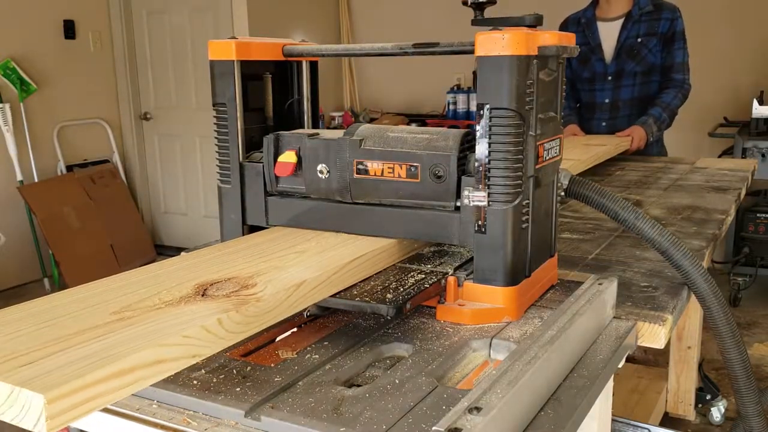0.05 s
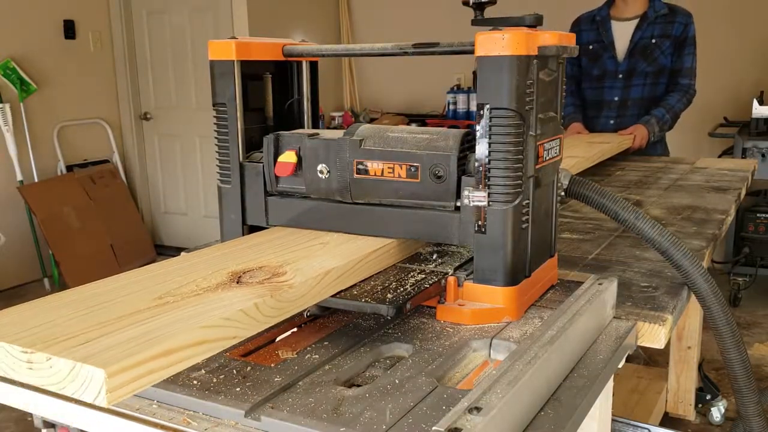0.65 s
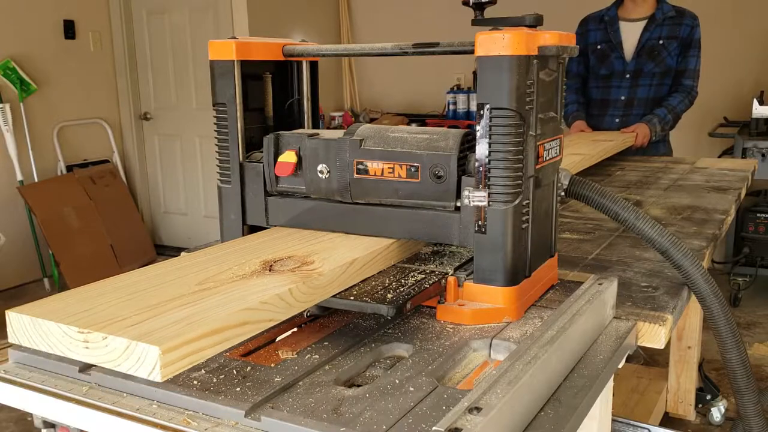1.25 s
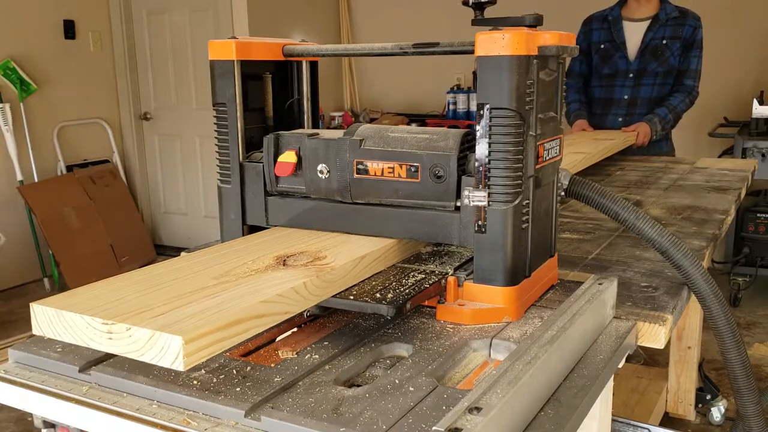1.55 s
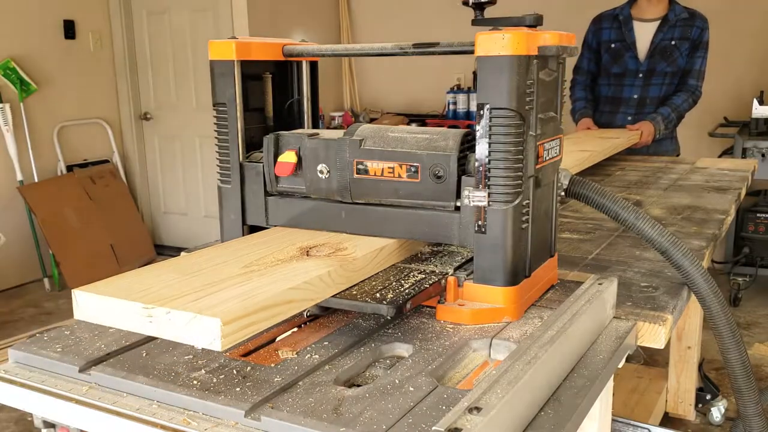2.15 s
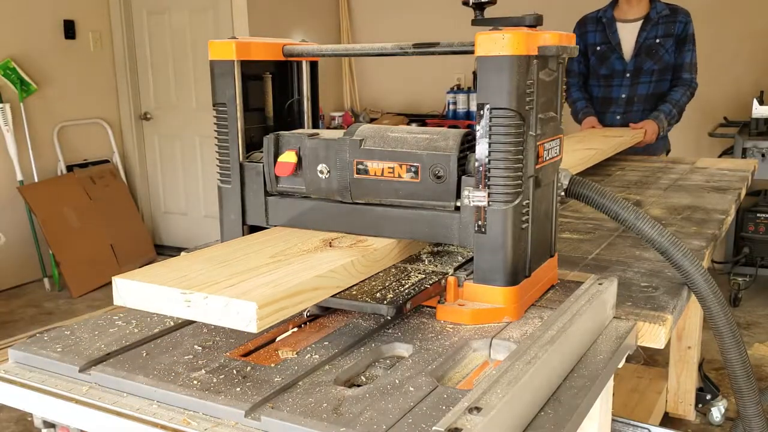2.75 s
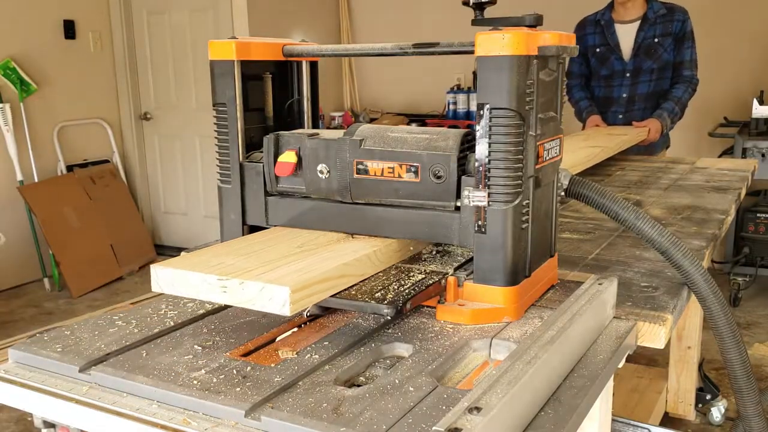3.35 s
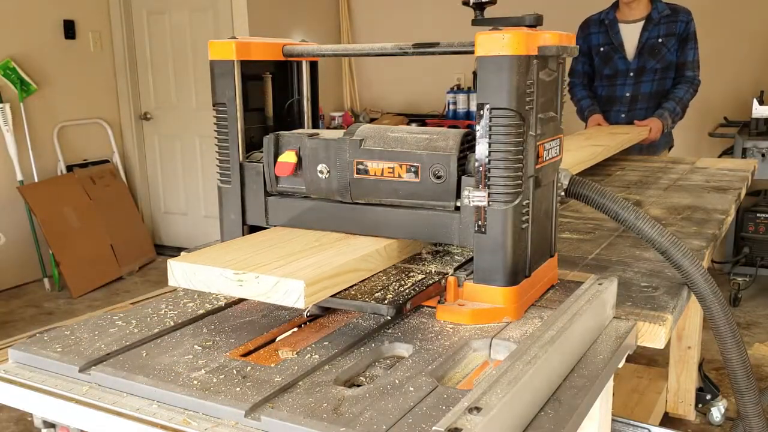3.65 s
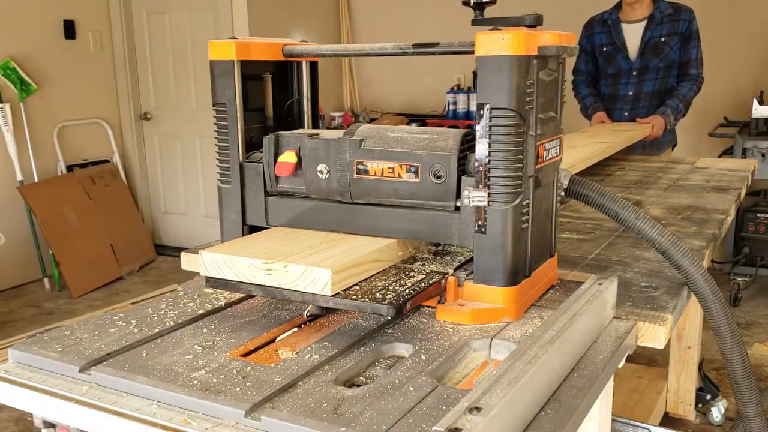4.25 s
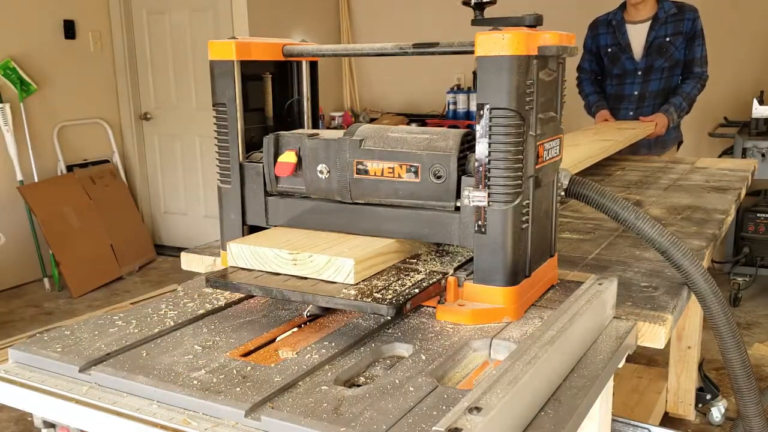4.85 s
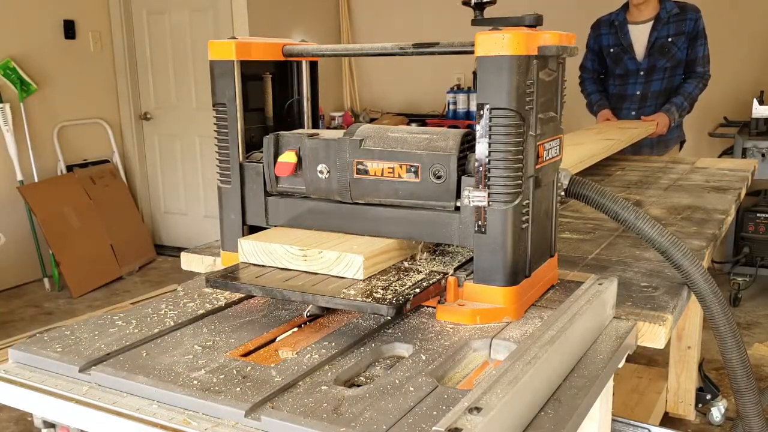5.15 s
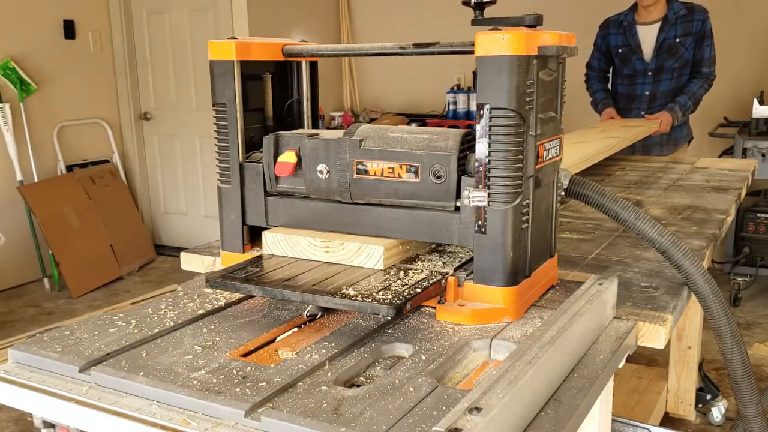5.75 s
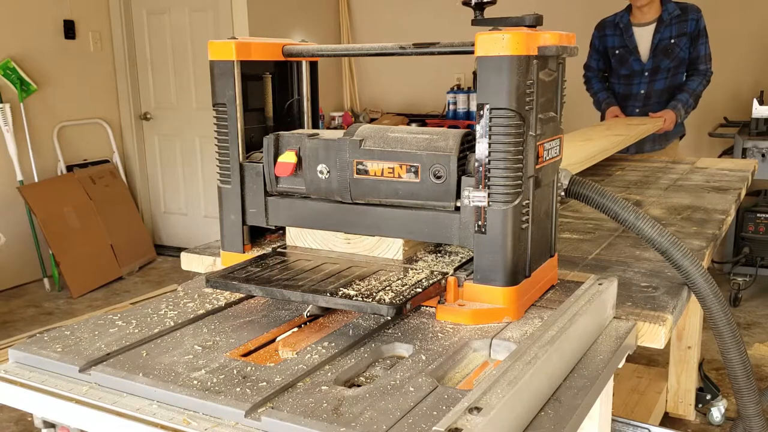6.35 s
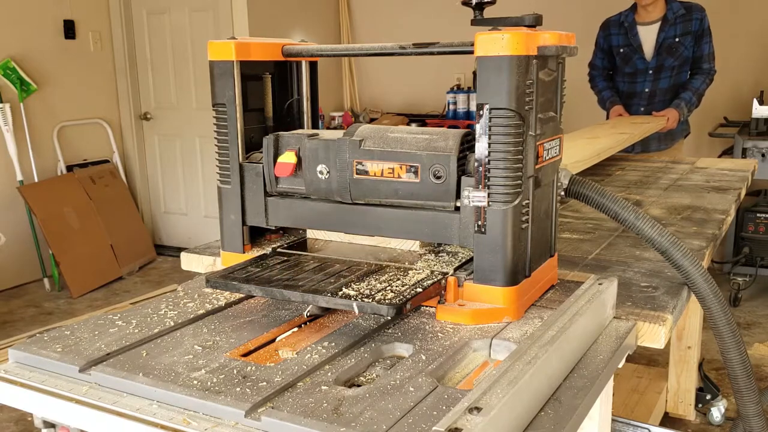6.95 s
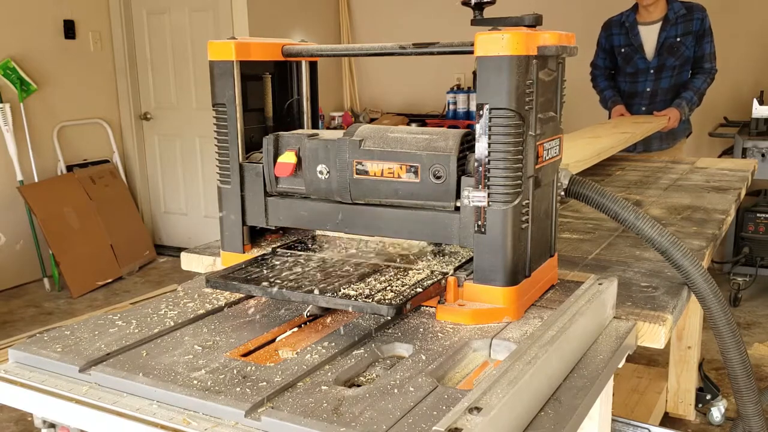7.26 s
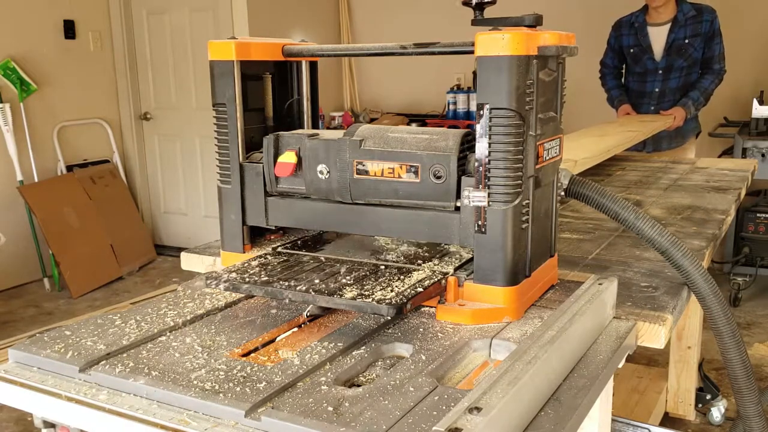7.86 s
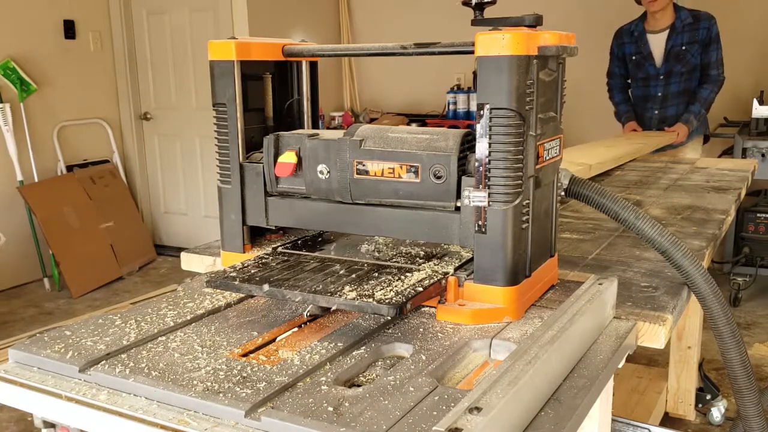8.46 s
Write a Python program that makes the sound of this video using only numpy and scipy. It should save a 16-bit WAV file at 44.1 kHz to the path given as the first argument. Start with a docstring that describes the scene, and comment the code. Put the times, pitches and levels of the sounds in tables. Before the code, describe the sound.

An electric wood planer cuts a board with a rasping, shifting howl and crackling chips, then eases into a quieter rising whirr.

```python
"""A benchtop thickness planer in a garage, heard on a stereo pair, a little left of centre.
At first it is cutting pine: two knives chop the wood at every turn, chips hiss over the rushing air,
and the board howls on multiples of the head speed, changing as it feeds through. From 6.2 s loose chips
crackle. At 7.3 s the board leaves and the head speeds up, the frame humming wherever a multiple of the
speed meets a resonance. Just before the end the background noise grows louder and deeper."""
import sys
import numpy as np
from scipy import signal
from scipy.fft import rfft, irfft, next_fast_len
from scipy.io import wavfile
from scipy.ndimage import uniform_filter1d

SR = 44100
rng = np.random.default_rng(int(sys.argv[2]) if len(sys.argv) > 2 else 0)


def to_wav(s):
    """Save 16-bit WAV."""
    ch = np.atleast_2d(s).T  # columns
    pcm = np.round(np.clip(ch, -1, 1) * 32767)  # PCM
    wavfile.write(sys.argv[1], SR, pcm.astype(np.int16))


N = 383669
TIME = np.arange(N) / SR
EXIT_S = 7.3  # the board leaves the knives
HUM_ORDERS, HOWL_ORDERS = (1, 2, 3, 4, 6, 8), (5, 6, 7, 8, 12)  # multiples of the head speed
SIDE = np.array([[.5], [-.5]])  # splits a level or phase gap between left and right


def gain_of(db):
    """Decibels to amplitude."""
    return 10 ** (np.asarray(db) / 20)


def unit_rms(x):
    """Scales to rms 1."""
    return x / np.sqrt(np.mean(abs(x) ** 2) + 1e-20)


def at_hz(points, hz):
    """Reads a spectrum table on a log-frequency axis."""
    table_hz, value = np.transpose(points)
    return np.interp(np.log(hz + 1), np.log(table_hz + 1), value)


def follow(rows, column=1):
    """One column of a time table at every sample."""
    rows = np.asarray(rows)
    return np.interp(TIME, rows[:, 0], rows[:, column])


def drift(rate_hz, hop=192):
    """A slow complex random curve of rms 1, with little above the given rate."""
    size = N // hop + 2
    hz = np.fft.fftfreq(size, hop / SR)
    spectrum = (rng.standard_normal(size) + 1j * rng.standard_normal(size)) / (1 + (hz / rate_hz) ** 4)
    knots = unit_rms(np.fft.ifft(spectrum)).astype(np.complex64)
    ramp = np.arange(hop, dtype=np.float32) / hop
    return (knots[:-1, None] + np.diff(knots)[:, None] * ramp).ravel()[:N]


def tint(x, points):
    """Gives a sound the colour of a spectrum table."""
    size = next_fast_len(N + 4096)
    colour = gain_of(at_hz(points, np.fft.rfftfreq(size, 1 / SR)))
    return irfft(rfft(x, size) * colour, size)[..., :N]


def patchy(x, surge_db, rate_hz, bands=9):
    """Lets each band of a noise surge on its own."""
    size = next_fast_len(N)
    spectrum = rfft(x.astype(np.float32), size)
    place = np.interp(np.fft.rfftfreq(size, 1 / SR), np.geomspace(1200, 13000, bands), np.arange(bands))
    out = np.zeros((2, N))
    for band in range(bands):
        share = np.maximum(1 - abs(place - band), 0).astype(np.float32)
        out += irfft(spectrum * share, size)[:, :N] * gain_of(surge_db * drift(rate_hz).real)
    return out


# The garage's sound field at the pair. Each row: frequency in Hz, left-right correlation.
COHERENCE = [(100, 1), (500, 0.7), (800, 0.5), (1300, -0.1), (2500, 0.4), (4000, 0), (8000, 0), (15000, 0)]
def noise_pair(points):
    """Coloured noise, alike at both microphones in the bass and diffuse in the treble."""
    size = next_fast_len(N)
    left, other = rfft(rng.standard_normal((2, size)))
    same = at_hz(COHERENCE, np.fft.rfftfreq(size, 1 / SR))
    right = same * left + np.sqrt(1 - same ** 2) * other
    pair = irfft(np.array([left, right]), size)[:, :N]
    return unit_rms(tint(pair, points))


# Cavities of the housing and chip chute. Each row: centre in Hz, width in Hz, gain in dB.
CAVITIES = [(1090, 120, -2.5), (1834, 38, 2.5), (2330, 110, 3), (2940, 110, 2), (4020, 110, -1.5),
            (4680, 49, 4.5), (6750, 1000, 2)]
def housing(pair, echo=.53, longest_s=.014, echoes=14):
    """Noise leaves through the cavities and reaches the microphones off table, board and walls."""
    size = next_fast_len(N + 4096)
    hz = np.linspace(0, SR / 2, 8193)
    cavities = gain_of(sum(db / (1 + (2 * (hz - centre) / width) ** 2) for centre, width, db in CAVITIES))
    delays_s = rng.uniform(.000988, longest_s, (2, echoes, 1))
    signs = rng.choice([-1, 1], (2, echoes, 1))
    reflections = (signs * np.exp(-2j * np.pi * hz * delays_s)).sum(1)
    response = abs(1 + echo * hz / (hz + 1000) * reflections) * cavities
    colour = np.array([np.interp(np.fft.rfftfreq(size, 1 / SR), hz, side) for side in response])
    return unit_rms(irfft(rfft(pair, size) * colour, size)[:, :N])


# The cutterhead under load. Each row: time in seconds, turns per second.
LOADED_SPEED = [(0.0, 114.35), (.55, 113.85), (.95, 113.9), (1.99, 114.6), (2.2, 115.1), (2.77, 114.85),
                (3.21, 116.4), (3.74, 115.9), (4.04, 116.5), (4.31, 116.4), (4.8, 113.1), (5.18, 113.3),
                (5.26, 113.8), (5.69, 114.4), (6.1, 115.9), (6.93, 116.8), (7.01, 117.2), (7.3, 117.5)]
FREE_HZ = 146
def head_speed(release_s=7.33, run_up_s=.72):
    """Turns per second: held down by the load, then easing up towards the free speed."""
    load = np.exp(-np.maximum(TIME - release_s, 0) / run_up_s)
    return FREE_HZ + (follow(LOADED_SPEED) - FREE_HZ) * load


def head_angle(flutter=.00074, flutter_hz=14):
    """Angle of the cutterhead; belt and wood grain make its speed flutter a little."""
    return 2 * np.pi * np.cumsum(head_speed() * (1 + flutter * drift(flutter_hz).real)) / SR


def bite(fade_s=.06):
    """Share of the cut that sounds: 1 until the board leaves, then dying away."""
    return np.exp(-np.maximum(TIME - EXIT_S, 0) / fade_s)


def knife_pulses(angle, depth, uneven):
    """Two swells a turn, one knife biting deeper than the other."""
    return unit_rms(np.exp(depth * np.cos(2 * angle) + uneven * np.cos(angle)))


def grain(surge_db=2.5, rate_hz=21.5):
    """Random surges of level in dB, as the knives meet the grain of the wood."""
    return surge_db * drift(rate_hz).real


# Air driven by the head and the motor fan. Each row: frequency in Hz, relative level in dB.
AIR_COLOUR = [(30, -60), (85, -27.5), (130, -30), (200, -19), (290, -14), (450, -16.5), (650, -15.5),
              (850, -3.5), (1260, -9), (2420, -9), (4000, -12.5), (4650, -14.5), (5100, -16.5), (8500, -27),
              (15500, -28)]
def air(angle, rush_db=-55.1, db_per_doubling=7.5, chop=.03, gust_hz=24, late_db=3.2, low_db=-68):
    """Rushing air grows with speed, lightly chopped by the knives."""
    late = np.clip((TIME - 8.45) / .11, 0, 1)  # near the end the background noise grows louder and deeper
    level_db = rush_db + db_per_doubling * np.log2(head_speed() / FREE_HZ) + late_db * late
    rush = patchy(housing(noise_pair(AIR_COLOUR)), surge_db=1.7, rate_hz=gust_hz)
    rush *= 1 + chop * np.cos(2 * angle)
    low_noise = noise_pair([(20, -24), (70, -11), (180, 1), (400, 3), (900, -1), (3000, -46)])
    gust_db = .55 * drift(gust_hz).real
    return rush * gain_of(level_db + gust_db) + low_noise * gain_of(low_db) * late


# Tones of armature, belt and fan. Each row: cycles per turn of the head, base level in dB.
MOTOR_TONES = [(2.17, -86), (4.37, -78), (6.25, -77), (7.62, -76.5), (25.88, -78), (34.54, -80)]
def motor(angle, flutter_hz=18, whine_order=25.88, whine_db=-63):
    """The motor is steady under load and whirrs roughly when free; its fan whine grows with speed."""
    steady = bite(fade_s=.24)
    flutter = .18 + 1.5 * (1 - bite(fade_s=.85))
    whirr = sum(gain_of(db) * (np.exp(1j * order * angle) * (steady + flutter * drift(flutter_hz))).real
                for order, db in MOTOR_TONES)
    whine = (np.exp(1j * whine_order * angle) * (.5 + drift(45))).real
    speed = head_speed()
    steep_rise = (speed / speed[-1]) ** 60
    return np.sqrt(2) * (whirr + gain_of(whine_db) * whine * steep_rise)


def tones(angle, orders, gains, rough, rough_hz, spread_rad):
    """Multiples of the head speed; they flutter more once no board steadies the head."""
    out = np.zeros((2, N))
    flutter = rough + .28 * (1 - bite())
    for order, gain in zip(orders, gains):
        wave = np.exp(1j * (order * angle + 2 * np.pi * rng.random())) * (1 + flutter * drift(rough_hz))
        # higher tones reach the two microphones more out of step
        skew = np.exp(1j * spread_rad * order * (1 + drift(.2).real))
        out += gain * np.array([wave * skew, wave / skew]).real
    return np.sqrt(2) * out


# Resonances of frame and stand. Each row: centre in Hz, width in Hz, level in dB when in tune.
FRAME_MODES = [(121.4, 13.5, -78), (140.8, 2.7, -74.5), (232, 4, -71.5), (270.7, 4.8, -70.5),
               (284.4, 1.3, -56.5), (339.7, 8.3, -80), (392, 130, -86), (460.3, 4.5, -72.5),
               (470.4, 9.3, -72.5), (584, 34, -65), (707, 100, -64), (820, 29, -66.5), (1075, 42, -69)]
def frame_hum(angle):
    """The spinning head shakes the frame; each low multiple swells as it passes through a resonance."""
    hz = np.geomspace(100, 1300, 4000)
    modes = [gain_of(db) / (1 + (2 * (hz - centre) / width) ** 2) ** .7
             for centre, width, db in FRAME_MODES]
    response = np.sqrt(sum(mode ** 2 for mode in modes))
    speed = head_speed()
    gains = []
    for order in HUM_ORDERS:
        share = 1 - bite() if order in HOWL_ORDERS else unsung(order)  # gives way to the board's tones
        gains.append(share * np.interp(order * speed, hz, response))
    return tones(angle, HUM_ORDERS, gains, rough=.15, rough_hz=20, spread_rad=.048)


# Hard spots and the board's end. Each row: middle and half length in seconds, extra rasp and spray in dB.
HARD_SPOTS = [(4.62, 0.055, 7, 0.5), (6.817, 0.058, 14, 4), (7.167, 0.2, 3, 3), (7.245, 0.032, 0, 2)]
def grabs():
    """The knives grab at each hard spot: a smooth bump in the rasp and in the spray, in dB."""
    return sum(np.outer(extra_db, np.exp(-((TIME - middle_s) / half_s) ** 2))
               for middle_s, half_s, *extra_db in HARD_SPOTS)


# The spray of torn chips. Each row: time in seconds, base level in dB.
SPRAY_LEVEL = [(0.0, -64.5), (.55, -64.5), (.95, -63), (1.48, -64), (2.29, -65.5), (2.73, -64),
               (2.86, -65.5), (3.69, -64), (3.85, -63.5), (4.21, -63), (4.45, -62.5), (4.73, -65),
               (7.15, -66.5)]
def spray():
    """Strength of the spray in dB; patter, tearing and the knives' sizzle all follow it."""
    return follow(SPRAY_LEVEL)


# Large chips hitting the housing. Each row: time in seconds, relative peak in dB.
LARGE_CHIPS = [(6.2714, -58), (6.322, -41), (6.4682, -49), (6.7087, -44), (6.7945, -45), (6.8199, -49),
               (7.095, -50), (7.2214, -45), (7.2384, -43.5), (7.248, -47), (7.257, -48)]
# The colour of a chip's tick. Each row: frequency in Hz, gain in dB.
TICK_COLOUR = [(500, -20), (4000, -10), (8500, -9), (12500, 1), (15500, 4)]
def chips(spray_db, small_per_s=900, loose_per_s=32, loose_from_s=6.2, loose_db=-53, ring_s=.0013):
    """Small chips patter on the housing; as the board's end nears, loose and large ones get out."""
    sizes = np.minimum(rng.exponential(1, (2, N)), 2)
    shower = unit_rms(sizes * (rng.random((2, N)) < small_per_s / SR))
    shower *= gain_of(spray_db - 7.5 + drift(6).real)  # slow surges of about 1 dB
    t = TIME[:512]
    tick = rng.standard_normal((2, len(t))) * np.exp(-t / ring_s)
    tick /= np.linalg.norm(tick, axis=1, keepdims=True)
    loose = (rng.random(N) < loose_per_s / SR) * (TIME > loose_from_s)
    peaks = sizes * loose * gain_of(loose_db)
    for time_s, db in LARGE_CHIPS:
        peaks[:, round(time_s * SR)] += gain_of(db + 4.5)
    hits = (shower + peaks / abs(tick).max()) * np.sqrt(bite())  # chips fall a little past the cut
    return tint(signal.oaconvolve(hits, tick, axes=1)[:, :N], TICK_COLOUR)


# The hiss of tearing fibres. Each row: frequency in Hz, relative level in dB.
TEAR_COLOUR = [(100, -64), (500, 0), (800, 3), (1300, 3.5), (2600, 2), (3500, 5.5), (4500, 0), (6500, -2),
               (8300, -5.5), (10000, -3.5), (12500, -0.5), (14500, -0.5), (15600, -2)]
def tearing(angle, spray_db, over_spray_db=5):
    """Fibres tear in a puff of noise at every knife pass."""
    hiss = patchy(housing(noise_pair(TEAR_COLOUR)), surge_db=1.1, rate_hz=14)
    puffs = knife_pulses(angle, depth=.16, uneven=.17)
    return hiss * puffs * gain_of(spray_db + over_spray_db + grain(surge_db=1.25))


# The shaken board. Each row: frequency in Hz, relative level in dB.
RASP_COLOUR = [(200, -27), (550, -21), (720, 1), (880, -5.5), (1300, -2), (2200, -8.5), (5000, -60)]
def rasp(angle, grab_db, usual_db=-68, follows_howl=.14):
    """Unequal blows in wild grain shake the board into a coarse rasp between the clean tones."""
    blows = knife_pulses(angle, depth=.49, uneven=.25)
    howl_db = follow(HIGH_HOWL)
    level_db = usual_db + follows_howl * (howl_db - howl_db.mean()) + grab_db
    return noise_pair(RASP_COLOUR) * blows * gain_of(level_db + grain(surge_db=3, rate_hz=30))


# Partials of the knife blows. Each row: frequency in Hz, relative strength in dB.
BLOW_COLOUR = [(340, -17), (570, -12), (1030, 2), (1260, 0.5), (1500, 2.5), (1850, 2.5), (2200, 3.5),
               (2600, 6.5), (3150, -2), (3450, -3), (3800, -7), (5000, -8), (6500, -11.5), (8000, -25)]
# The buzz's low body and the edge above it. Each row of both: time in seconds, base level in dB.
BUZZ_BODY = [(0, -53), (0.45, -55.5), (1.15, -53), (1.9, -56), (2.4, -60), (2.8, -53.5), (3.05, -56),
             (3.3, -54.5), (3.9, -54), (4.35, -55), (4.6, -51.5), (4.87, -56.5), (5.25, -56), (5.6, -54),
             (5.9, -54.5), (6.2, -56.5), (6.7, -54.5), (6.95, -57), (7.1, -52.5), (7.3, -52.5)]
BUZZ_EDGE = [(0, -55), (0.24, -60.0), (0.35, -61.5), (0.8, -59.5), (1.3, -60), (1.7, -56.5), (2.1, -55),
             (2.38, -62.0), (2.68, -57.5), (3.03, -64), (3.2, -53), (3.5, -59), (3.68, -60), (4.4, -57.5),
             (4.6, -56.5), (4.75, -58), (5.06, -65), (5.41, -63.5), (5.9, -59.5), (6.38, -56.5),
             (6.7, -59.5), (6.92, -61.5), (7.1, -55), (7.3, -54)]
def knives(angle, split_hz=(2250, 3400), smear_s=.002, scatter_hz=3, swell_db=3.5, swell_hz=1.3):
    """The blows buzz; each partial swells and fades as the board's overhang changes its modes."""
    turn, wave = np.exp(1j * angle).astype(np.complex64), np.ones(N, np.complex64)
    bands, powers = np.zeros((3, 2, N), np.float32), np.zeros((3, N), np.float32)
    head_hz = np.median(follow(LOADED_SPEED))
    for order in range(1, 68):
        wave = wave * turn
        if order in HUM_ORDERS + HOWL_ORDERS:
            continue
        hz = order * head_hz
        lag = 2 * np.pi * hz * smear_s * rng.random() / np.sqrt(order)  # the housing smears each blow
        lead = 1.34 * rng.standard_normal()  # radians between the microphones
        direct = (np.exp(1j * (lag + SIDE * lead)).astype(np.complex64) * wave).real
        same = float(np.clip(at_hz(COHERENCE, hz), 0, 1))
        left = drift(scatter_hz)
        right = same * left + (1 - same ** 2) ** .5 * drift(scatter_hz)
        scattered = (np.array([left, right]) * wave).real  # off the garage walls
        even_db = 1 if order % 2 == 0 else 0  # two nearly equal knives favour even multiples
        gain = gain_of(at_hz(BLOW_COLOUR, hz) + even_db + swell_db * drift(swell_hz).real)
        steady = .65 * (1 + 1000 / hz)  # low partials hold steadier
        partial = gain * (steady * direct + scattered)
        index = np.searchsorted(split_hz, hz)
        powers[index] += (partial ** 2).mean(0)
        bands[index] += partial * unsung(order)
    out = np.zeros((2, N))
    levels_db = follow(BUZZ_BODY) - 1, follow(BUZZ_EDGE) - 1, spray() + .5  # body, edge, sizzle
    for band, power, db in zip(bands, powers, levels_db):
        rms = np.sqrt(uniform_filter1d(power.astype(float), size=4000) + 1e-12)
        out += band / rms * gain_of(db + grain())  # the partials share the power of the cut
    return out


def placed(wave, level_db, pan_db):
    """Sets a complex tone between the microphones, the left louder by pan_db."""
    sides = gain_of(SIDE * pan_db)
    return 2 * wave.real * gain_of(level_db) * sides / np.linalg.norm(sides, axis=0)


def held(t, start, end):
    """A note swells, holds and fades: 0 to 1."""
    ease = min((end - start) / 3, NOTE_EASE_S) / 2
    return np.interp(t, [start - ease, start + ease, end - ease, end + ease], [0, 1, 1, 0])


# The board's clearest notes. Each row: start and end in seconds, multiple of the head speed,
# base level in dB, left minus right in dB, lead at the left microphone in radians.
BOARD_NOTES = [(-0.1, 0.2, 26, -63, 6, -2), (-0.1, 0.268, 22, -57, 1, -1.5), (-0.1, 0.568, 14, -60, 5, 2),
               (-0.1, 0.83, 19, -64, 12, -1.5), (-0.1, 0.9, 16, -62.5, 2, -1.7),
               (-0.1, 1.26, 10, -58.5, 0.5, 2), (-0.1, 1.28, 20, -62.0, 1, 3.5),
               (0.08, 0.29, 24, -63.0, 1, 0.5), (0.19, 0.48, 38, -67, 1, 1.7),
               (0.23, 0.598, 18, -58.0, -1.5, -2), (0.24, 0.4, 33, -66.0, 0, 0.1),
               (0.293, 1.296, 12, -55.5, 1, 0.5), (0.35, 0.53, 41, -71.0, 3, -3.5),
               (0.52, 1.76, 33, -70.5, -3, 1.5), (0.55, 1.45, 43, -74.0, 9, 5),
               (0.63, 1.42, 27, -64, 0, -1.2), (0.68, 1.08, 37, -70.0, 4, 0.5),
               (0.71, 1.94, 24, -65, 2, 1.2), (0.73, 1.49, 39, -70, 2, -2.5), (0.75, 1.16, 35, -69, 6, 0),
               (0.76, 1.7, 30, -66, 2, 2), (0.84, 1.32, 7, -63, 5, 0.5), (0.91, 1.9, 41, -75, -1, 5.5),
               (0.96, 2.11, 18, -63.5, 3, -1.5), (1.03, 1.39, 26, -64.5, 8, -3),
               (1.07, 1.47, 21, -58.5, 10, 1.5), (1.14, 2.377, 16, -60, 1, 1.24),
               (1.22, 1.725, 22, -60, 3, 1), (1.507, 1.83, 4, -72, 2, 0.1), (1.57, 2.81, 12, -60.0, 5, 1.5),
               (1.62, 2.02, 37, -73.5, 0, 2), (1.634, 2.87, 9, -58, 4, 4),
               (1.64, 1.99, 42, -70.5, -1, -1.9), (1.78, 2.09, 14, -58.5, 7, 1),
               (1.83, 3.07, 4, -68.5, 2, 0.1), (1.87, 2.92, 30, -71, 4, 3.5),
               (2.383, 2.758, 16, -60.5, 2, 0.8), (2.46, 2.85, 33, -65, 2, -0.6),
               (2.58, 3.48, 23, -61.5, 4, 1.2), (3.07, 4.266, 4, -71.0, 1.5, 0.4),
               (3.12, 3.34, 7, -59.0, -2, -1), (3.13, 3.45, 40, -72.0, 5, 3),
               (3.154, 3.57, 25, -62, 3, 0.7), (3.18, 3.62, 21, -61.5, 4, 0.5),
               (3.19, 3.55, 22, -61.5, 1, 0.8), (3.21, 3.46, 28, -63.5, 1, 1.5),
               (3.38, 3.97, 42, -80, 1, 1), (3.76, 4.03, 32, -67, 0, 4.5), (3.86, 4.06, 40, -68.0, 1, -0.3),
               (3.88, 4.27, 31, -65, 3, 1.5), (3.93, 4.97, 19, -61.5, 5, 0.6), (4.18, 5.31, 7, -58, 0, 1.5),
               (4.2, 4.493, 34, -65, 2, 1.5), (4.21, 4.72, 16, -62.5, -2, 0.5),
               (4.462, 4.78, 18, -59, 3, 1.6), (4.476, 4.63, 10, -58.5, 2, -1.1),
               (4.573, 4.68, 13, -53.5, 3, 0.7), (4.68, 5.16, 27, -63, 2, -1.5),
               (4.73, 5.173, 24, -62, 5, 1), (4.8, 5.04, 26, -63, -1, -1.3), (4.82, 5.11, 25, -65, 9, 0.5),
               (4.83, 4.98, 44, -67, -2, 2.4), (4.93, 5.17, 30, -63, 3, -2),
               (4.97, 5.634, 12, -59, -2, 0.9), (5.0, 5.288, 28, -62.5, 3, 1.7),
               (5.07, 5.318, 33, -67, 3, 1.7), (5.4, 5.673, 13, -56.5, 4.5, 0.7),
               (5.55, 5.802, 19, -58, 7, -0.3), (6.06, 6.783, 20, -63.5, 1, -0.5),
               (6.16, 6.41, 40, -71, 1, 1.3), (6.178, 6.74, 7, -55.5, 10, -1),
               (6.406, 6.765, 22, -62.5, 1, 1), (6.93, 7.19, 38, -69, 0, -2),
               (6.93, 7.26, 10, -60, 8, -2.5), (7.013, 7.335, 12, -51, 5, 0.5),
               (7.05, 7.22, 40, -67, 1, -1.0), (7.05, 7.33, 23, -60, 2, 1.1),
               (7.09, 7.26, 18, -60.5, 6, 0.2), (7.1, 7.33, 29, -63, 0, -1.0),
               (7.15, 7.33, 27, -63.5, 1, -2)]
NOTE_EASE_S = .12  # longest swell or fade
def singing(angle, lift_db=.2, smear_rad=2.2):
    """Modes of the moving board sing briefly on multiples of the speed; all stop as the board leaves."""
    out = np.zeros((2, N))
    wobble = 1 + .09 * drift(22) + .09 * drift(3)
    lags = smear_rad * rng.standard_normal(size=64)
    offsets = (rng.random(len(BOARD_NOTES)) * N).astype(int)  # each note wobbles in its own way
    for (start, end, order, db, pan_db, lead), offset in zip(BOARD_NOTES, offsets):
        at = np.flatnonzero((TIME > start - NOTE_EASE_S) & (TIME < end + NOTE_EASE_S))
        wave = np.exp(1j * (order * angle[at] + lags[order] + SIDE * lead)) * wobble[(at + offset) % N]
        out[:, at] += placed(wave, db + lift_db, pan_db) * held(TIME[at], start, end)
    return out * bite(fade_s=.045)


def unsung(order):
    """Share of a multiple that is left when a note of the board takes it over."""
    t = TIME[::256]
    notes = (held(t, start, end) for start, end, multiple, *_ in BOARD_NOTES if multiple == order)
    taken = np.minimum(sum(notes, np.zeros_like(t)), 1)
    return np.interp(TIME, t, 1 - .8 * taken).astype(np.float32)


def strong_tone(phase, rows, lead, lift_db=.4, rough=.08, rough_hz=22):
    """One strong, slightly rough tone of the board, louder and earlier at one microphone."""
    wave = np.exp(1j * (phase + SIDE * lead)) * (1 + rough * drift(rough_hz))
    return placed(wave, follow(rows) + lift_db, pan_db=follow(rows, column=2))


# The howl at 6 times the speed. Each row: time in seconds, base level in dB, left minus right in dB.
LOW_HOWL = [(0, -49.5, 5), (.2, -50, 4.5), (.45, -54, 4.5), (.95, -53, 3.5), (1.55, -50, 4.5),
            (1.95, -48.5, 3.5), (2.3, -50.5, 5.5), (2.55, -48, 4.5), (3.03, -53, 6), (3.24, -49, 2.5),
            (4.3, -52.5, 2), (4.42, -49, 4), (4.63, -48.5, 3.5), (4.78, -60.5, 8), (5.05, -59.5, 7),
            (5.45, -50, 3), (5.8, -48, 4), (6.2, -48.5, 4), (6.5, -56.5, -7), (6.75, -60, -9),
            (6.83, -53, 1), (7.08, -53.5, 5), (7.3, -59.5, 0)]
# The howl at 8 times the speed. Each row: the same three, then lead at the left microphone in radians.
HIGH_HOWL = [(0, -54.5, 7, 1.5), (.35, -51.5, 5, 1.3), (.75, -50.5, 1, 0.86), (1.35, -50, 7, 1.2),
             (1.7, -58, 6, 4.2), (2.0, -59, 5, 4), (2.22, -70, 7, 5), (2.53, -58.5, 10, 0.7),
             (2.85, -65, 10, 5.5), (3.05, -56.5, 5, -0.5), (3.3, -59.5, 6, -1), (3.75, -56, -1, 0.5),
             (4.0, -56.5, 3, 1.9), (4.28, -57, -1, -1.5), (4.47, -49.5, 4, 2.5), (4.57, -62, 4, 2.5),
             (4.7, -55, 1, -0.2), (5.55, -52.5, 2, 1), (5.9, -61.5, 23, 5.5), (6.06, -52.5, 2, 0.5),
             (6.3, -54.5, 1, .7), (6.7, -54.5, 4, -0.5), (6.93, -49.5, 4, 1), (7.14, -52.5, 9, -0.1),
             (7.3, -56.5, 6, 5)]
def howl(angle, weak_db=(-78.5, -65.5, -65), wander_db=2.2, wander_hz=3.2):
    """Two strong tones of the board trade places and shift across the pair; three weaker ones wander."""
    under, low, between, high, octave = HOWL_ORDERS
    weak_orders = under, between, octave
    gains = [gain_of(db + wander_db * drift(wander_hz).real) * unsung(order)
             for order, db in zip(weak_orders, weak_db)]
    weak = tones(angle, weak_orders, gains, rough=.3, rough_hz=25, spread_rad=.058)
    low_tone = strong_tone(low * angle, LOW_HOWL, lead=.3 * drift(.38).real)
    high_tone = strong_tone(high * angle, HIGH_HOWL, lead=follow(HIGH_HOWL, column=3))
    return weak + low_tone + high_tone


# The planer stands a little left of the pair. Each row: frequency in Hz, left minus right in dB.
LEFT_LEAN = [(115, 0.5), (230, 1.5), (460, 1.8), (690, 4), (950, 0.5), (1400, 3), (2500, 2), (4500, 1.8),
             (8000, 1.3), (14000, -1)]
def scene():
    """The machine and the board as they reach the microphones, locked to the cutterhead."""
    angle = head_angle()
    rasp_grab_db, spray_grab_db = grabs()
    spray_db = spray() + spray_grab_db
    cut = bite() * (knives(angle) + rasp(angle, rasp_grab_db))
    cut += bite(fade_s=.12) * tearing(angle, spray_db)
    machine = cut + chips(spray_db) + frame_hum(angle) + motor(angle) + air(angle)
    left = tint(machine[0], [(hz, db / 2) for hz, db in LEFT_LEAN])
    right = tint(machine[1], [(hz, -db / 2) for hz, db in LEFT_LEAN])
    return np.array([left, right]) + bite() * howl(angle) + singing(angle)


def record(dry):
    """The recorder passes nothing above about 16 kHz."""
    lowpass = signal.firwin(1023, 15760, window=("kaiser", 9), fs=SR)
    return signal.oaconvolve(dry, lowpass[None], "same")


dry = scene()
out = record(dry)
to_wav(out)
```